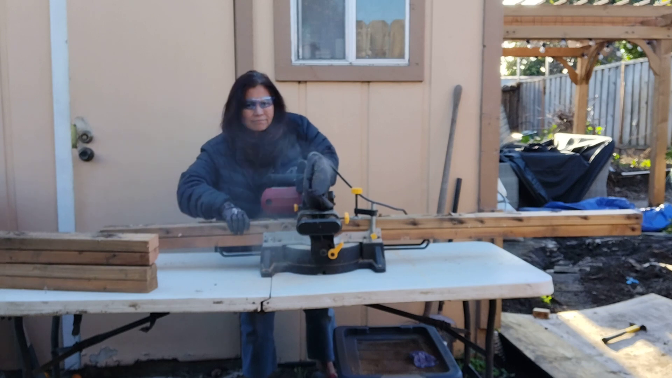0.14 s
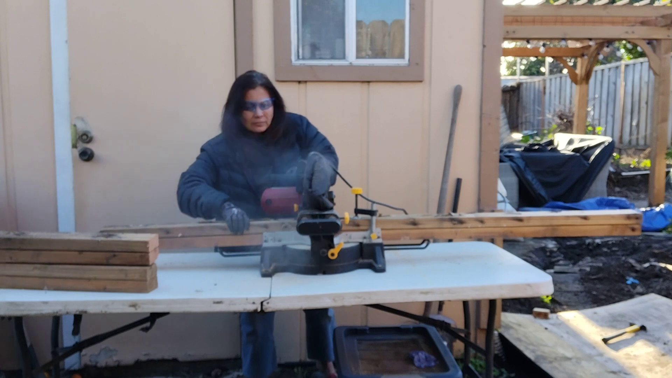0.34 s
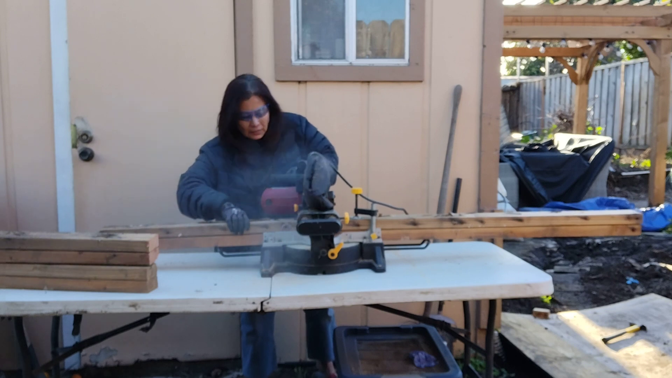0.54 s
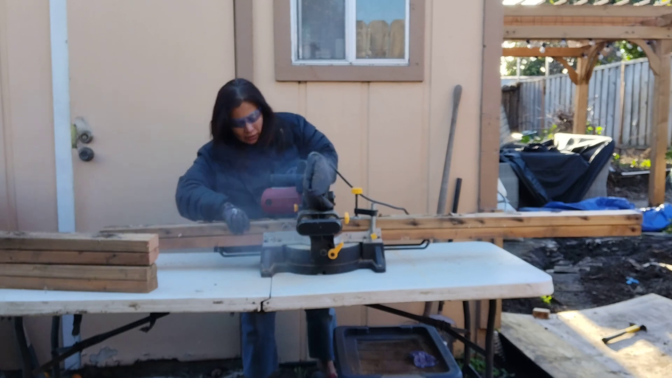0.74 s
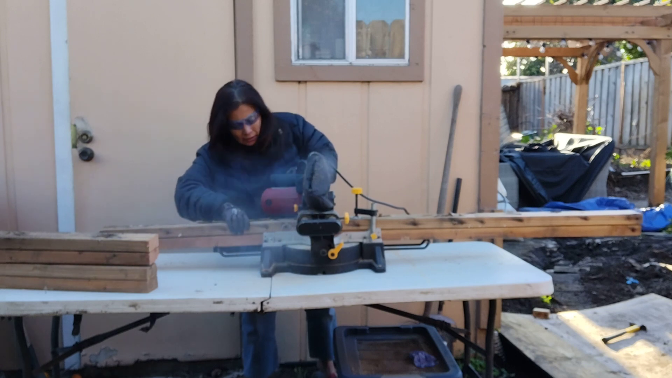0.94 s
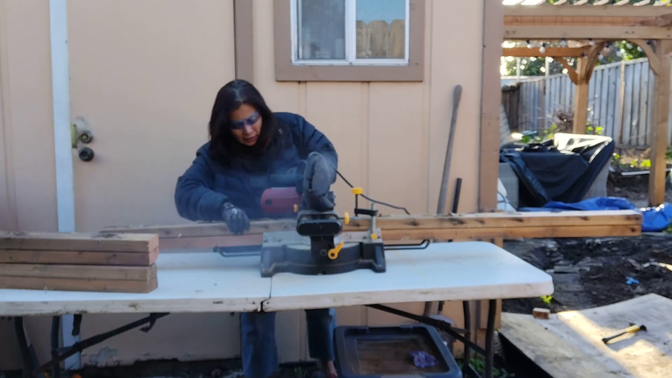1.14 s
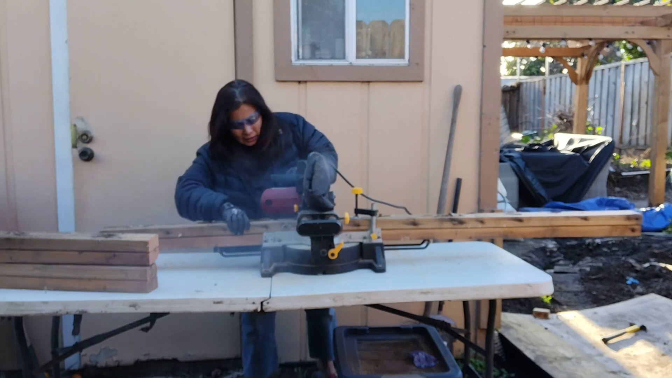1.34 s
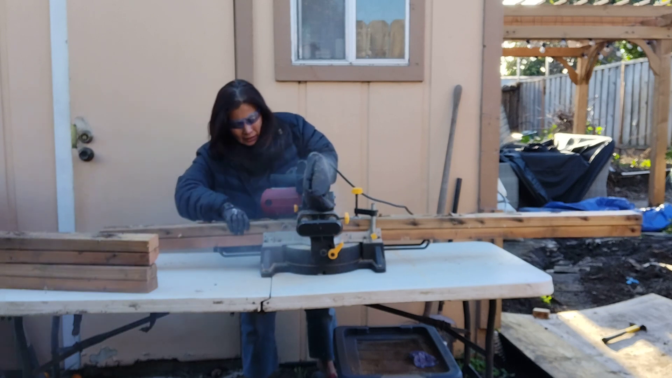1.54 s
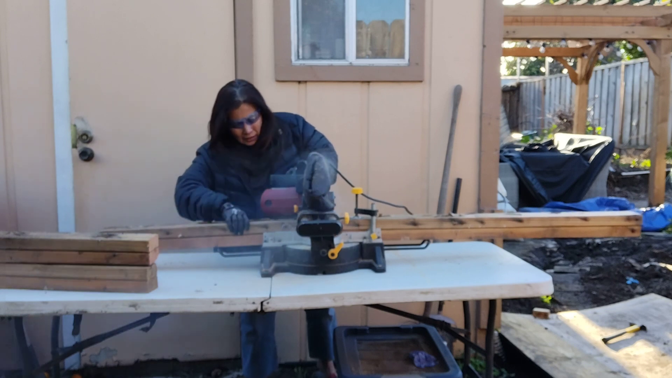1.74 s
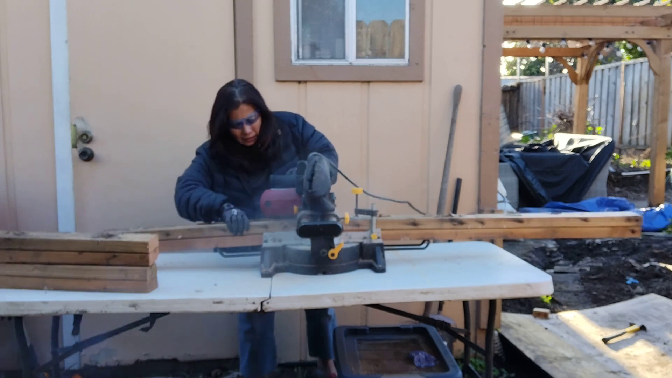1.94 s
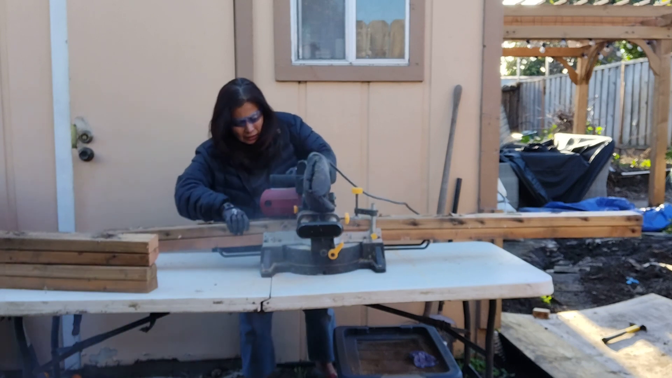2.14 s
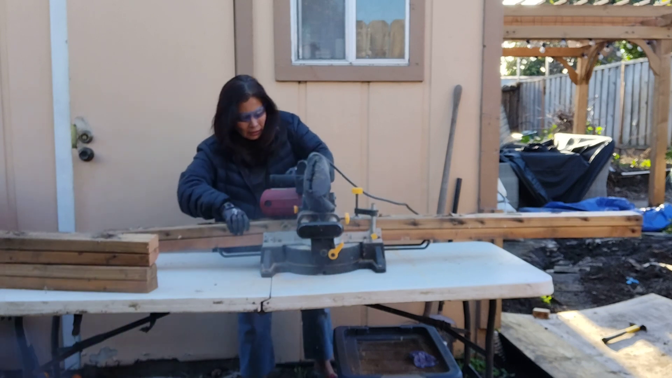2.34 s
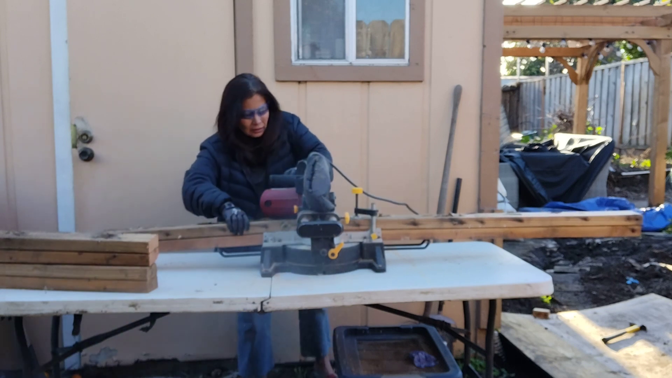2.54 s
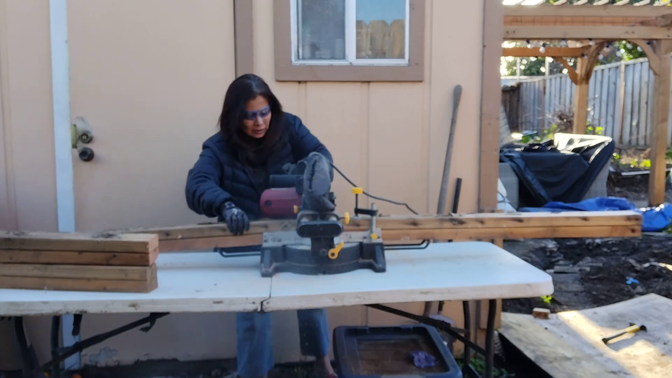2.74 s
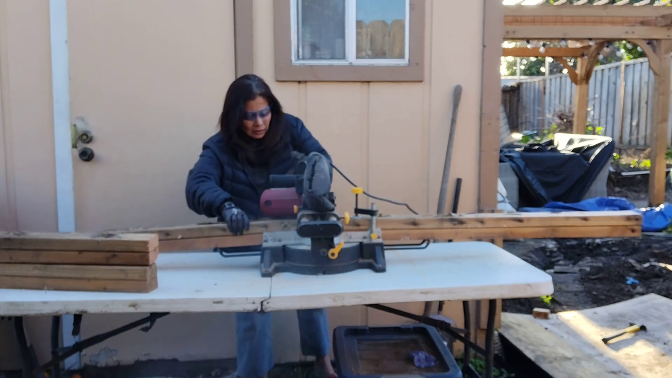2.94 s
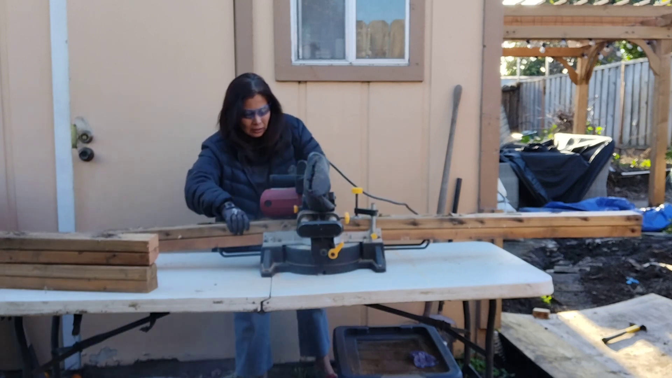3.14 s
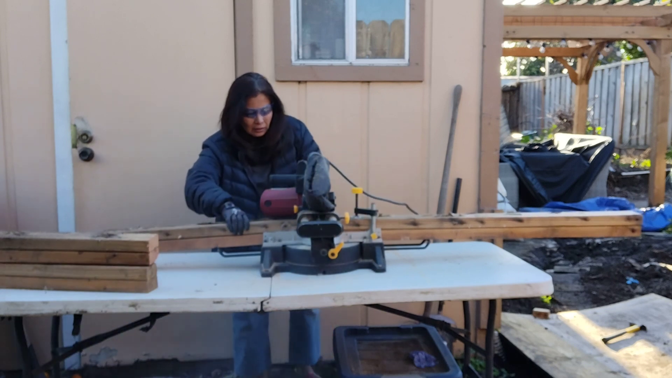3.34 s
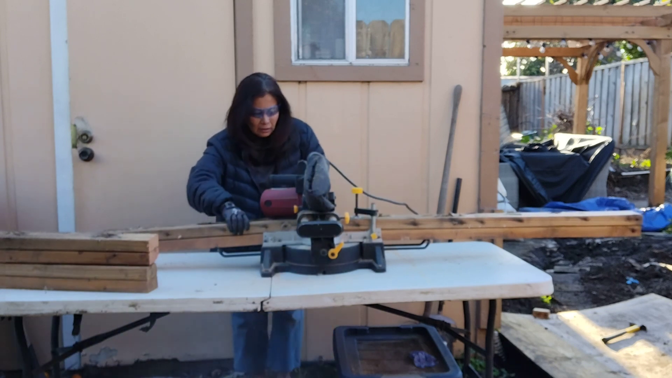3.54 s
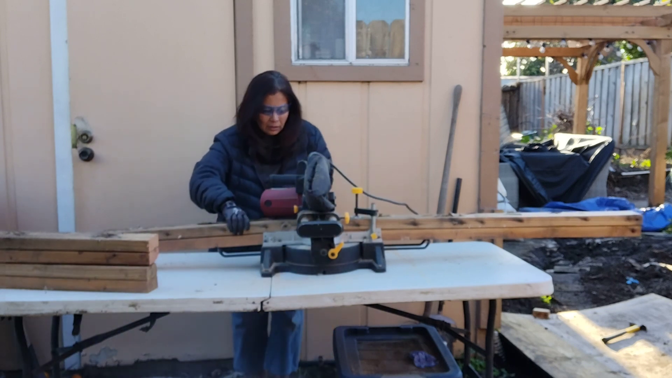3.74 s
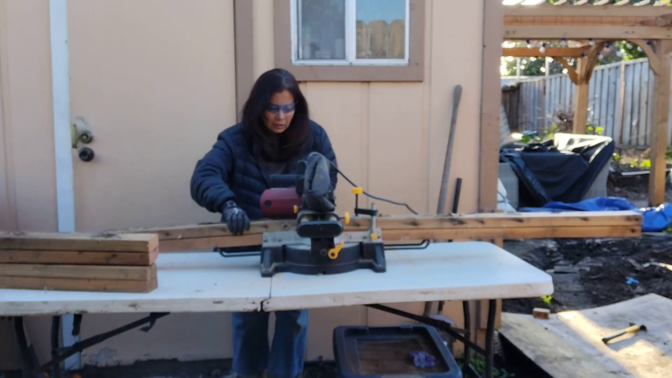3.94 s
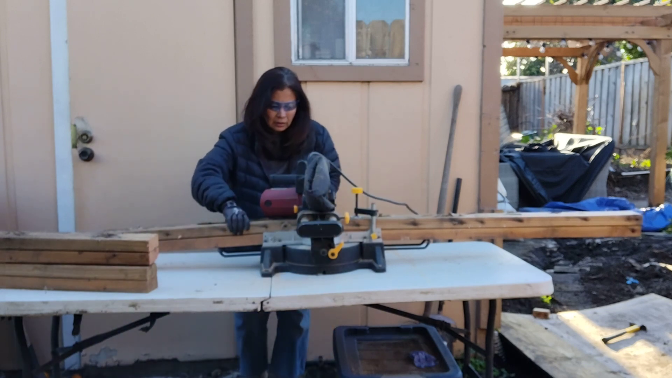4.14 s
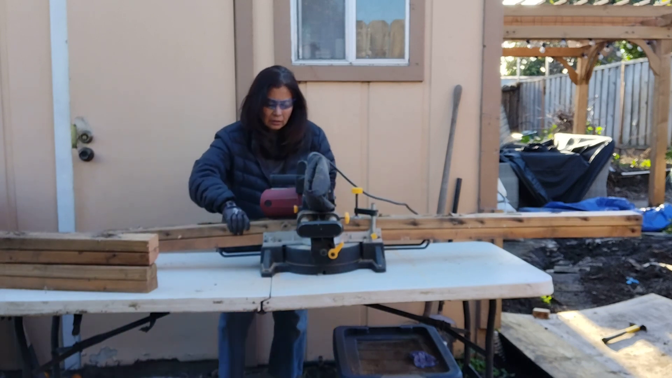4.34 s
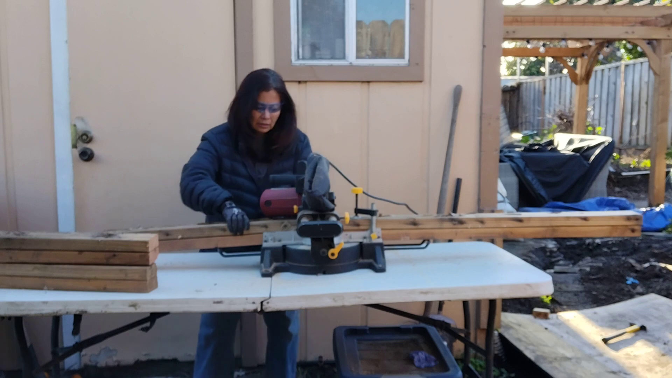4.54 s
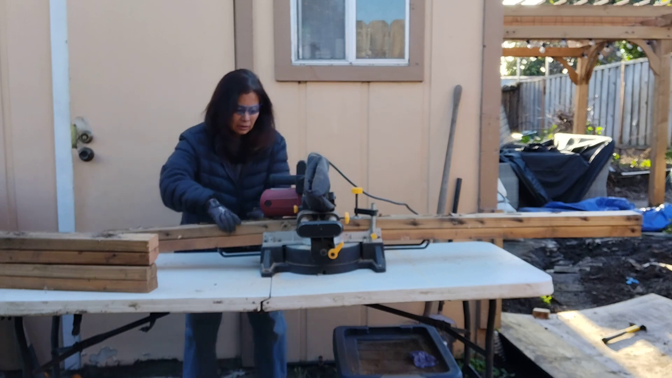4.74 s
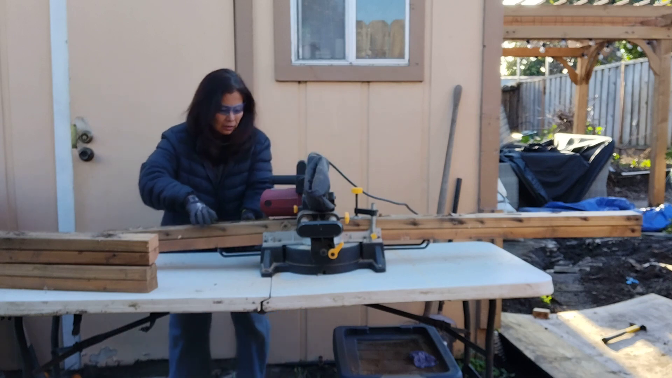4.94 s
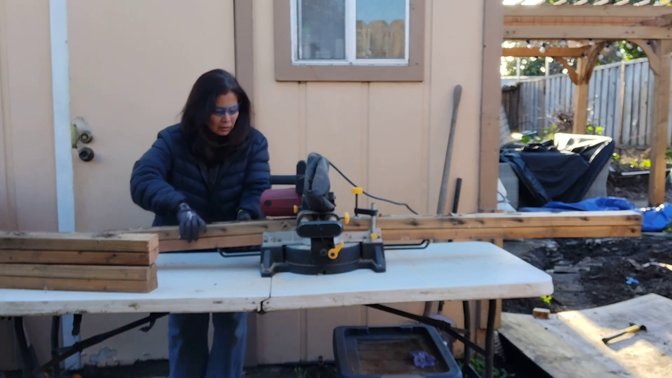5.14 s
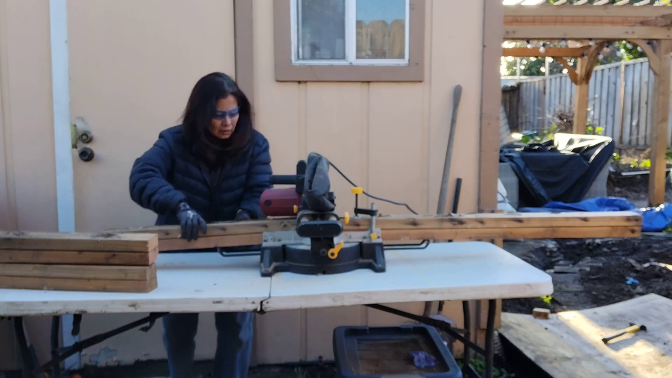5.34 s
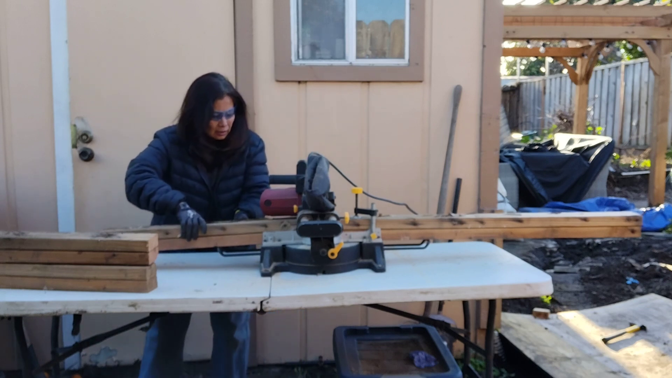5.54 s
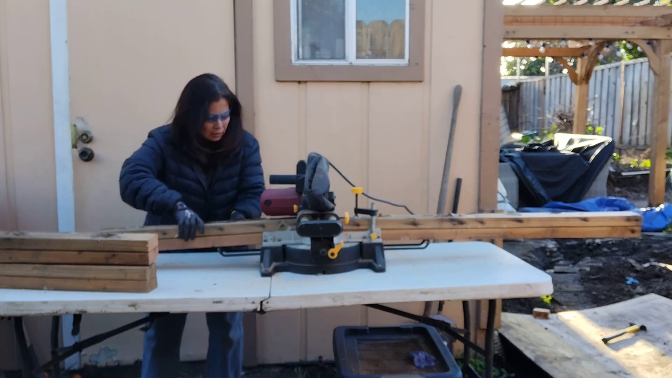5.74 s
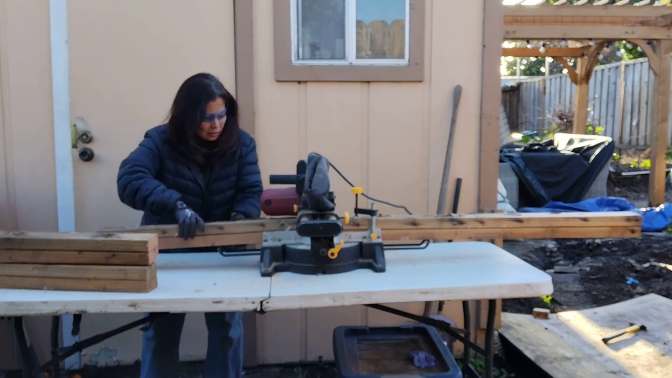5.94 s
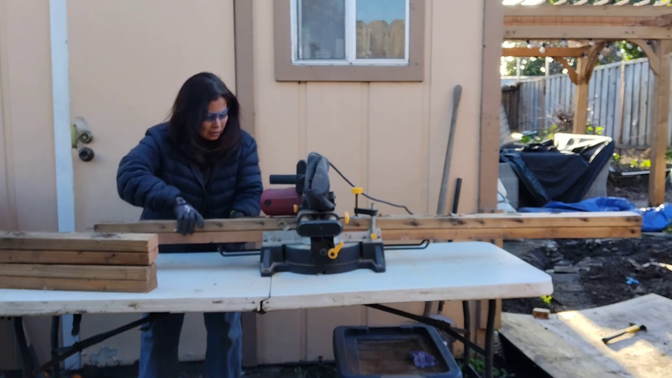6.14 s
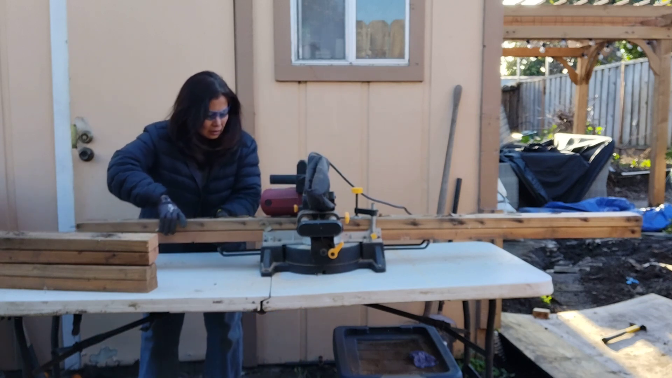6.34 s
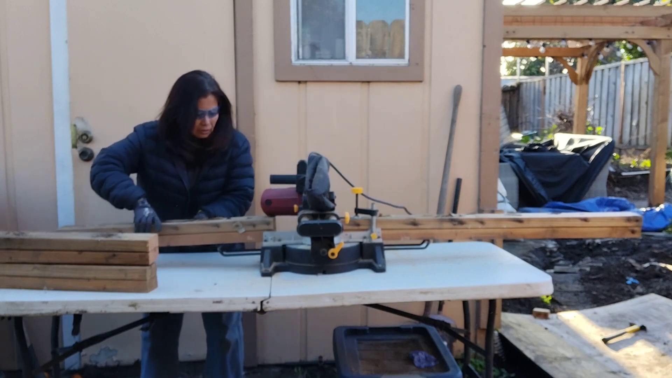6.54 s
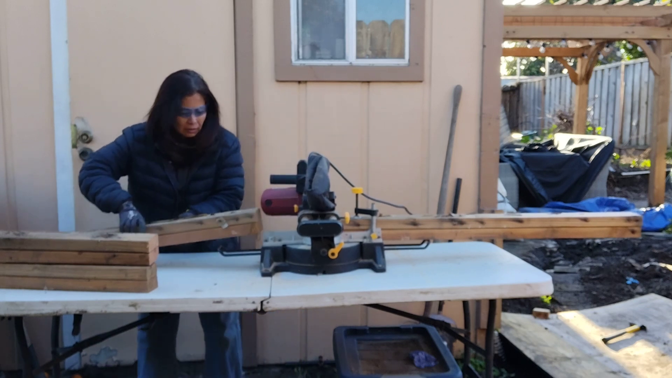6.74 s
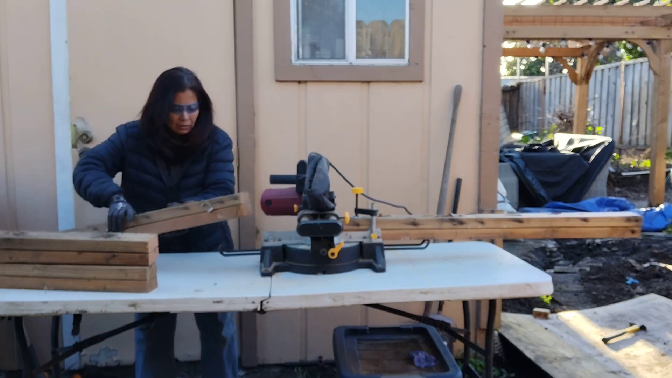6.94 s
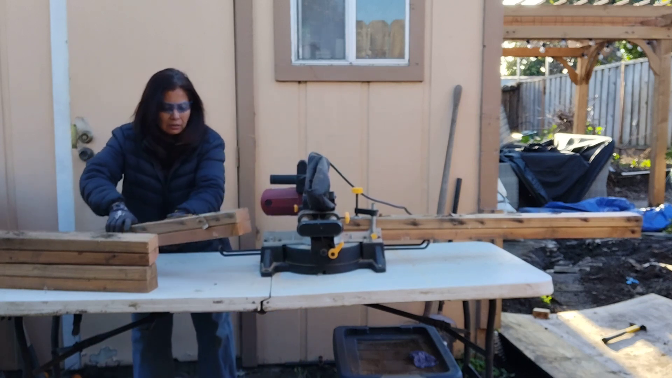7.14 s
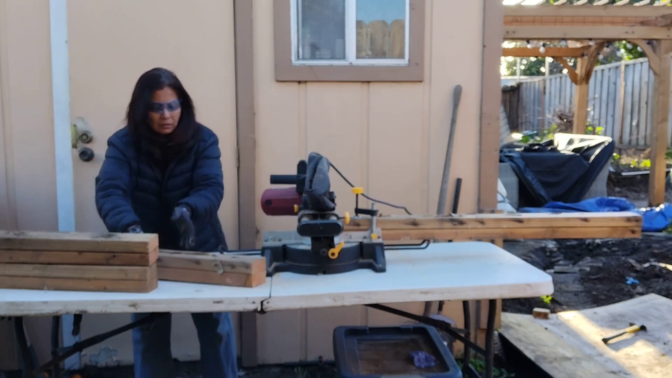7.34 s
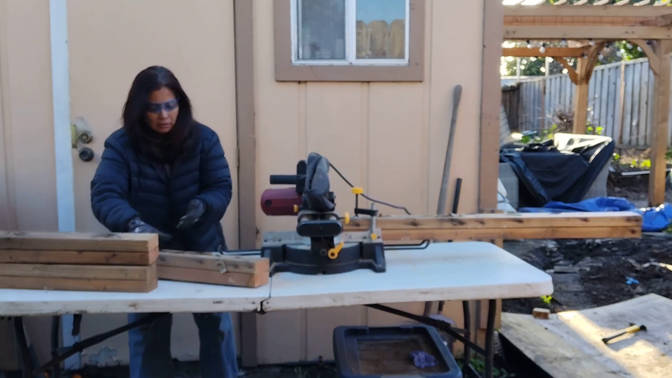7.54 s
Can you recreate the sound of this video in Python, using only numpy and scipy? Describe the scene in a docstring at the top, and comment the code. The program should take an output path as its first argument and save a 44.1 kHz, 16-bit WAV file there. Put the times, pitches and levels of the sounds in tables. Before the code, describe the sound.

Loud power saw cutting a board outdoors, teeth shrieking, then blade winding down slowly, followed by clunks and a rattle as the offcut is set down.

```python
"""A miter saw cuts old lumber in a backyard

The teeth sing and rasp while gears and motor strain; then the blade runs free and coasts down.
One curve of blade speed steers the tones, the repeating and steady noise, and the falling whistles.
The offcut slides with bursts of rough noise, knocks as wood and folding table ring in decaying
modes, and rattles a steel support. Fading noise gives the answer of the house wall."""
import sys
import numpy as np
from scipy import signal
from scipy.fft import rfft, irfft, next_fast_len
from scipy.io import wavfile

SR = 44100
rng = np.random.default_rng(int(sys.argv[2]) if len(sys.argv) > 2 else 0)


def wrap_up_sound(samples):
    """Save the sound to the file named by the first command line argument, as 16-bit audio."""
    columns = np.atleast_2d(samples).T
    # keep every value between -1 and 1, then stretch to whole-number steps
    tamed = np.clip(columns, -1, 1)
    steps = np.round(tamed * 32767).astype(np.int16)
    wavfile.write(sys.argv[1], SR, steps)


N = 338688  # length in samples

OFF_S = 2.592  # the trigger is let go, in seconds
TOOTH_COUNT = 40  # teeth on the blade
GEAR_RATIO = 5.168  # turns of the motor shaft per turn of the blade

# The clack of wood, also used for the support and the dragging wood.
# Each row: frequency in Hz, relative level in dB per Hz.
CLACK_SPECTRUM = [(400, -21), (750, 3.5), (1200, -5), (1900, -6.5), (2600, -15.5), (4000, -23.5)]


def amp(db):
    """Turn decibels into a gain."""
    return 10 ** (np.asarray(db) / 20)


def unit(x):
    """Scale a sound to an rms level of 1."""
    return x / np.sqrt(np.mean(np.abs(x) ** 2) + 1e-20)


def along(points, hz):
    """Read a value between (Hz, value) points on a logarithmic frequency axis."""
    f, v = np.transpose(points)
    return np.interp(np.log(hz + 1), np.log(f + 1), v)


def curves(rows):
    """Draw one value per sample for each column after the time in seconds."""
    s, *cols = np.transpose(rows)
    return [np.interp(np.arange(N) / SR, s, c) for c in cols]


def wobble(rate):
    """Make a smooth random curve of rms 1 with about rate random points a second."""
    return unit(signal.resample(rng.standard_normal(int(N * rate / SR) + 4), N))


def filtered(x, response):
    """Shape the spectrum of x by a response, a function of frequency."""
    n = x.shape[-1]
    m = next_fast_len(n + SR // 4)
    return irfft(rfft(x, m) * response(np.fft.rfftfreq(m, 1 / SR)), m)[..., :n]


def resonance(f, hz, width):
    """Respond like a body that vibrates most at one frequency, with gain 1 there."""
    return 1j * f * width / (hz * hz - f * f + 1j * f * width)


def colored(x, spectrum):
    """Give x a spectrum that fades out at both ends, and an rms level of 1."""
    ends = [(spectrum[0][0] / 2, -120), *spectrum, (spectrum[-1][0] * 2, -120)]
    return unit(filtered(x, lambda f: amp(along(ends, f))))


def noise(spectrum, size=N):
    """Make independent mid (center) and side noise with the given spectrum."""
    return colored(rng.standard_normal((2, size)), spectrum)


def blend(share, a, b):
    """Mix unrelated sounds by their share of the power."""
    return np.sqrt(share) * a + np.sqrt(1 - share) * b


def add(track, s, sound):
    """Mix a sound into a track at time s in seconds."""
    part = track[:, round(s * SR):][:, :sound.shape[-1]]
    part += sound[:, :part.shape[-1]]


def envelope(s, length, attack, t60):
    """Rise at time s, hold until length seconds later, then fall 60 dB per t60 seconds."""
    t = np.arange(N) / SR - s
    return np.clip(t / attack, 0, 1) * amp(-60 * np.maximum(t - length, 0) / t60)


def line(turns, multiple, flutter):
    """Make one fluttering tone locked to the turns; its side part runs about a quarter cycle off."""
    phase = 2 * np.pi * (multiple * turns + rng.random()) + flutter * wobble(35)
    mid_side = np.array([np.cos(phase), np.sin(phase + 0.1 * wobble(3.1))])
    return np.sqrt(2) * (1 + flutter * wobble(35)) * mid_side


def narrow(shaft, multiple, width, size=32768):
    """Make a noise band around a multiple of the shaft rate; narrower bands hold more steady tone."""
    knots = rng.standard_normal((2, size)) + 1j * rng.standard_normal((2, size))
    drift = np.array([np.interp(2 * width * multiple * shaft, np.arange(size), k) for k in knots])
    steady = np.exp(-width / 0.0087) * 4 * np.exp(2j * np.pi * rng.random((2, 1)))
    carrier = np.exp(2j * np.pi * multiple * shaft)
    return np.sqrt(2) * np.real(unit(drift + steady) * carrier)


def bites(turns, spectrum, size=4096):
    """Repeat a noise pattern with each turn, as every tooth tears or rubs in its own way."""
    pattern = signal.resample(rng.standard_normal((2, size // 7)), size, axis=1)
    repeated = np.array([np.interp(turns % 1, np.arange(size) / size, p) for p in pattern])
    return colored(repeated, spectrum)


def by_speed(speed, db, slope, stall_rate=0, order=4):
    """Lower the gain as a power of the speed, and steeply below the stall rate in turns per second."""
    return amp(db) * (speed / speed.max()) ** slope / (1 + (stall_rate / speed) ** order)


def near(speed, best, reach):
    """Make a gain that peaks at the best speed and is halved reach octaves away."""
    return .5 ** ((np.log2(speed / best) / reach) ** 2)


def power(release_s=0.09):
    """Return 1 while the motor pulls, falling to 0 as the trigger is let go."""
    return np.clip((OFF_S - np.arange(N) / SR) / release_s, 0, 1)


def blade_speed():
    """Drive the blade in turns per second, then let friction and air drag slow it."""
    # The blade under power. Each row: time in seconds, turns per second.
    spin = [(0.0, 52.8), (0.12, 53.7), (0.25, 54.6), (0.4, 55.3), (0.7, 56.54), (1.2, 56.53), (1.7, 56.78),
            (2.0, 57.72), (2.2, 59.44), (2.5, 60.3)]
    friction_per_s, air_drag_per_turn = .618, .0089
    tail_rate, tail_friction_per_s = 29.8, .53  # turns per s at switch-off, slower decay of the last turns
    driven = curves(spin)[0]
    coast = np.maximum(np.arange(N) / SR - OFF_S, 0)
    decay = np.exp(-friction_per_s * coast)
    drag = driven * air_drag_per_turn / friction_per_s * (1 - decay)
    slowing = driven * decay / (1 + drag)
    return np.maximum(slowing, tail_rate * np.exp(-tail_friction_per_s * coast))


def housing(x, direct_db=0):
    """Add the resonances of the housing, which radiates little deep bass or top treble."""
    # Each row: frequency in Hz, width in Hz, level in dB.
    modes = [(155, 30, 6), (515, 60, 18.5), (962, 32, 20.5), (1880, 130, 10), (3300, 300, 6),
             (5700, 900, 11)]

    def body(f):
        return amp(direct_db) + sum((amp(db) - 1) * resonance(f, hz, width) for hz, width, db in modes)

    def radiation(f):
        return f ** 4 / (f ** 4 + 145 ** 4) / (1 + (f / 10000) ** 4)

    return filtered(x, lambda f: body(f) * radiation(f))


def drive(turns, load, bite):
    """Gears and motor sing at multiples of the blade rate under load, until the blade breaks through."""
    # Tones of the loaded drive. Each row: multiple of the blade rate, level in dB before a 2 dB cut.
    loaded = [(6, -42.5), (8, -36.5), (9, -32), (10, -34.5), (16, -36.5), (17, -26), (24, -39), (25, -35.5),
              (27, -39), (31, -41.5), (33, -34), (37, -38.5), (39, -34), (41, -32), (42, -36), (44, -34.5),
              (53, -37.5), (56, -36.5), (60, -40), (69, -39.5), (70, -31), (73, -37.5), (79, -39),
              (81, -34.5), (93, -39.5), (96, -39), (98, -37), (100, -40.5), (111, -42), (116, -42.5),
              (118, -39), (121, -34.5)]
    # Low hum of the motor under load. Each row: multiple of the blade rate, level in dB.
    motor = [(3.668, -40), (4.649, -40.5), (5.604, -47)]
    hum_order, whine_order = 18, 32  # cycles per turn of the blade
    hum_db, whine_db = -37.5, -32.5
    whine_grows = 6.3  # dB per dB of load
    gears = housing(amp(hum_db) * load ** 0.15 * line(turns, hum_order, flutter=0.17))
    whine = amp(whine_db) * load ** whine_grows * line(turns, whine_order, flutter=0.32)
    strain = sum(amp(db - 2.0) * line(turns, round(k), flutter=0.41) for k, db in loaded)
    hum = sum(amp(db) * line(turns, k, flutter=0.12) for k, db in motor)
    in_cut = np.minimum(2 * bite, 1)
    return in_cut * (gears + whine + load * strain) + np.minimum(2 * load, 1) * hum


def teeth(turns, bite):
    """The tooth rate and its overtones grow with the bite; at times one swells to a squeal in the cut."""
    # Teeth striking wood. Each row: multiple of the tooth rate, level in dB at a bite of 0 dB.
    overtones = [(1, -29), (2, -29.5), (3, -30.5), (4, -38), (5, -46), (6, -50), (7, -52)]
    # Squeals. Each row: start in seconds, length in seconds, multiple of the tooth rate, level in dB.
    squeals = [(0.057, 0.29, 2, -28.5), (0.197, 0.062, 1, -18.5), (0.425, 0.35, 1, -18),
               (0.46, 0.18, 2, -28.5), (0.659, 0.65, 2, -16.5), (1.168, 0.53, 1, -22.5),
               (1.626, 0.16, 2, -23), (1.67, 0.049, 1, -20), (0.053, 0.19, 4, -39.5),
               (0.952, 0.54, 4, -34.5), (0, 0.39, 3, -28), (0, 0.35, 6, -41.5), (0, 0.58, 7, -36.5)]
    teeth_grow = 0.88  # dB per dB of bite
    attack_s, squeal_t60 = 0.031, 0.79  # seconds
    out = np.zeros((2, N))
    for multiple, db in overtones:
        squeal_power = 0
        for s, length, k, level in squeals:
            if round(k) == round(multiple):
                squeal_power = squeal_power + amp(2 * level) * envelope(s, length, attack_s, squeal_t60) ** 2
        gain = np.sqrt((amp(db) * bite ** teeth_grow) ** 2 + squeal_power)
        flutter = 0.15 * max(multiple - 1, 1) ** 0.91
        out = out + gain * line(turns, round(multiple) * TOOTH_COUNT, flutter)
    return out


def machine(speed, turns, load, bite, clatter=0.17, judder_db=1.1, strain_db=2):
    """Rumble, air rush, hiss and the rasp of the cut; the motor shaft chops them as it slows."""
    # Spectra at high and low speed. Each row: frequency in Hz, relative level in dB per Hz.
    rumble_fast, rumble_slow = [(26, -64.5), (45, -31), (133, -20.5), (201, -11), (247, -14.5), (286, -12),
                                (326, -8.5), (406, -10.5), (514, 2.5), (650, -10), (846, -2.5), (995, -3.5),
                                (1090, -21), (1310, -9), (1500, -17.5), (1950, -36), (3300, -120)], [(45, -28), (95, -8), (125, -21), (158, -9), (200, -16.5),
                                                (290, -12), (420, -9), (522, 6.5), (630, -12), (780, -1),
                                                (870, -5.5), (950, 7), (1060, -29.5), (1500, -29)]
    rush_fast, rush_slow = [(800, -23.5), (1150, 5), (1700, -1), (2300, 4.5), (2700, -1), (3500, 0),
                            (4300, -13.5), (5500, -26.5)], [(800, -21), (1150, 8), (2000, 5.5), (2700, 1.5), (3300, -5),
                                          (4100, -13.5), (5500, -21)]
    hiss_fast, hiss_slow = [(3200, -27.5), (4400, -0.5), (5600, 1.5), (6700, -3), (8000, -9.5),
                            (9200, -14.5), (12000, -19), (15800, -17)], [(3200, -15), (4400, -4), (5600, 10.5), (6500, -2), (8000, -8.5),
                                          (9200, -26.5), (12000, -34), (15800, -19.5)]
    # Teeth tearing wood. Each row: frequency in Hz, relative level in dB per Hz.
    rasp_spectrum = [(3200, -12), (4300, 6.5), (5500, 2.5), (6700, -0.5), (7600, -7), (9000, -7),
                     (10500, -21.5), (12000, -26.5), (13500, -9), (15800, -20.5)]
    # All this noise swells and sinks. Each row: time in seconds, gain in dB.
    swell = [(1.4, 0.5), (2.1, 3), (2.6, 1.5), (2.95, -3), (3.7, 3), (4.4, 3.5), (5.45, 2), (5.8, 6.5),
             (6.17, 0.5), (6.35, 3), (6.9, 6), (7.25, -15)]
    # Levels at full speed, and the powers of the speed they follow.
    rumble_db, rumble_slope = -26.5, 1.17
    rush_db, rush_slope = -24, 1.304  # air stirred by the blade
    rush_load_db, rush_grows = -28, 4.2  # added rush at a load of 0 dB; dB per dB of load
    hiss_db, hiss_slope, hiss_stall_rate = -30.5, 0.27, 26.4  # air hiss, dying below this many turns per s
    bearing_db, bearing_slope = -49.5, 1.08  # bearing hiss, which outlasts the air
    rasp_db = -23.5  # at a bite of 0 dB
    tooth_repeat, ripple_share = .4, 0.16  # shares repeating with the blade in wood, with the motor shaft

    fast = np.clip((speed - 14) / 32, 0, 1)
    in_wood = np.clip(load, 0, 1)
    locked = tooth_repeat * in_wood

    rumble = blend(fast, noise(rumble_fast), amp(-0.5) * noise(rumble_slow))
    rumble = by_speed(speed, rumble_db + strain_db * in_wood, rumble_slope) * rumble

    flow = np.hypot(by_speed(speed, rush_db, rush_slope), amp(rush_load_db) * load ** rush_grows)
    ripple = unit(np.sqrt(speed) * bites(GEAR_RATIO * turns, rush_slow, size=1400))
    slow = amp(-3.0) * blend(ripple_share, ripple, noise(rush_slow))
    rush = flow * blend(locked, bites(turns, rush_fast), blend(fast, noise(rush_fast), slow))

    rasp = amp(rasp_db) * bite * blend(locked, bites(turns, rasp_spectrum), noise(rasp_spectrum))

    air = by_speed(speed, hiss_db, hiss_slope, hiss_stall_rate) * (1 - in_wood / 2)
    bearing = by_speed(speed, bearing_db, bearing_slope)
    hiss = np.hypot(air, bearing) * blend(fast ** 4, noise(hiss_fast), noise(hiss_slow))

    shaft = 1 + clatter * (1 - fast) * np.cos(2 * np.pi * GEAR_RATIO * turns)
    runout = 1 + 0.19 * in_wood * np.cos(2 * np.pi * turns)  # pulses once a turn in the wood
    level = amp(curves(swell)[0] + judder_db * wobble(45))
    return shaft * runout * level * (rumble + rush + rasp + hiss)


def plate():
    """The pinched blade plate rings at its own pitch as it breaks through."""
    # Each row: start in seconds, length in seconds, pitch in Hz, level in dB.
    rings = [(1.821, 0.021, 970, -25), (1.902, 0.067, 955, -18.5)]
    attack_s, ring_t60 = 0.015, .16  # seconds
    t = np.arange(N) / SR
    return sum(amp(db) * envelope(s, length, attack_s, ring_t60) * line(t, hz, flutter=0.19)
               for s, length, hz, db in rings)


def free_blade(speed, turns, load):
    """Out of the wood the teeth whine in the air, rising with speed and fading soon after switch-off."""
    # Each row: multiple of the motor shaft rate, level in dB, relative width.
    whines = [(7.686, -27.5, 0.022), (15.8, -45.5, 0.016), (33.4, -48, .015)]
    reach_oct = 0.31  # they fall 6 dB this far below full speed
    whine = sum(amp(db) * narrow(GEAR_RATIO * turns, k, width) for k, db, width in whines)
    return (1 - np.minimum(load, 1)) ** 2 * near(speed, speed.max(), reach_oct) * whine


def buzz(speed, turns, size=4096, count=48):
    """The coasting motor sounds multiples of its shaft rate: a dense bundle of tones that fall together."""
    # Each row: multiple of the shaft rate, level in dB at full speed.
    levels = [(5, -49), (10, -46), (12, -53), (16, -47), (20, -45), (23, -46), (26, -55), (29, -52),
              (36, -52), (40, -60), (48, -62)]
    slope, stall_rate = .8, 19  # power of the speed; it dies below this many turns per s
    jitter_turns = .008  # unsteadiness of the shaft
    k = np.arange(count + 1)
    random_phase = np.exp(2j * np.pi * rng.random((2, len(k))))
    lines = amp(along(levels, k)) * (k >= levels[0][0]) * random_phase
    cycle = irfft(lines, size) * size / np.sqrt(2)
    shaft = GEAR_RATIO * turns + jitter_turns * wobble(50)
    wave = np.array([np.interp(shaft % 1, np.arange(size) / size, c) for c in cycle])
    return wave * by_speed(speed, 0, slope, stall_rate) * (1 - power())


def whistles(speed, turns, echo=0.55):
    """Whistles speak near their own speeds and, like the gear drone, flare at housing resonances."""
    # Whistles and hisses of the coasting motor, fan and blade.
    # Each row: multiple of the motor shaft rate, level in dB, relative width,
    # blade turns per second where it is loudest, octaves of speed to fall 6 dB.
    voices = [(1.963, -45, .015, 72, 0.6), (2.997, -55, 0.044, 12, 0.35), (3.89, -54, .05, 13, .5),
              (4.483, -43, 0.011, 46, 0.5), (5.99, -50.5, 0.012, 45, 1.04), (7.826, -44, 0.007, 25, 0.31),
              (8.13, -44, .012, 39, 0.65), (8.96, -32.5, .01, 58.5, .5), (9.07, -48.5, .015, 21, 0.46),
              (9.5, -31.5, .04, 66, 0.34), (16.06, -40.5, .008, 31, 0.5), (17.9, -38, .009, 33.6, 0.69),
              (18.37, -34.5, 0.053, 58, 0.57), (27.7, -46.5, .06, 38, 0.3), (32, -55, .03, 13, 0.5),
              (36, -44.5, 0.05, 32, 0.57), (45.8, -51, .025, 22, 0.14), (63.3, -57, 0.004, 5.36, .12)]
    powered_db = -18  # gain of the whistles while the motor pulls
    drone_order = 20  # cycles of the unloaded gears per turn of the blade
    drone_db, drone_slope, drone_stall_rate, drone_attack_s = -28, 1.73, 19.6, 0.33
    air = sum(amp(db) * near(speed, best, reach) * narrow(GEAR_RATIO * turns, k, width)
              for k, db, width, best, reach in voices)
    air = air * amp(powered_db * power())
    slack = np.clip((np.arange(N) / SR - OFF_S) / drone_attack_s, 0, 1)
    drone_gain = slack * by_speed(speed, drone_db, drone_slope, drone_stall_rate)
    drone = drone_gain * line(turns, drone_order, flutter=0.53)
    # The gears sound mostly through the resonances.
    direct = housing(air + buzz(speed, turns), direct_db=-3) + housing(drone, direct_db=-13)
    return direct + echo * wall(direct[0])  # the late echo beats against the falling pitch


def imbalance(speed, turns, load, order=12):
    """Out of the wood the rotor hums near its shaft rate, until the housing can no longer radiate it."""
    hum_multiple, hum_db = 1.03, -41  # multiple of the shaft rate; level
    stall_rate = 27.4  # turns per s where it fades
    gain = amp(hum_db) / (1 + (stall_rate / speed) ** order) * (1 - np.minimum(load, 1)) ** 4
    return gain * line(turns, hum_multiple * GEAR_RATIO, flutter=0.2)


def wooden(modes):
    """Combine modes of alternating sign, with the deepest bass and the treble softened."""
    def response(f):
        ringing = sum((-1) ** k * amp(level) * resonance(f, hz, width)
                      for k, (hz, width, level) in enumerate(modes))
        return ringing / (1 + 1j * f / 900) * 1j * f / (45 + 1j * f)
    return response


def knocks(thud_t60=0.077, clack_t60=0.14, crack_t60=0.046, attack=0.0012, push=22, size=SR // 2):
    """Wood lands on one edge, then the other, pushing table and board into their modes with clacks."""
    # Wood striking the saw and table. Each row: time in seconds, table level in dB and board level
    # in dB (both before a 6 dB cut), clack level in dB, crack level in dB.
    strikes = [(5.759, -58, -49, -50, -46), (5.786, -64, -50, -37.5, -62), (5.836, -65, -45, -42, -60),
               (6.283, -66, -56, -47, -66), (6.403, -43.5, -42, -36.5, -38.5),
               (6.666, -41, -32, -33.5, -44.5), (6.752, -42, -36.5, -41, -61),
               (6.853, -22, -24, -40, -48.5), (6.876, -42, -44.5, -39.5, -42.5),
               (6.895, -34, -40, -41, -58), (6.982, -27, -36, -41, -60), (7.431, -29, -33.5, -34, -46.5),
               (7.447, -16.5, -27, -18.5, -27.5), (7.497, -20, -26, -21, -34.5),
               (7.555, -17.5, -24, -23.5, -36.5), (7.583, -28.5, -42, -21, -43),
               (7.641, -18, -31.5, -23, -42)]
    # The folding table and the offcut. Each row: frequency in Hz, width in Hz, level in dB.
    table_modes, board_modes = [(69.4, 29, -10.5), (136, 97, -7.5), (223, 51, -1), (256, 33, 1),
                                (334.7, 32, -5)], [(400, 170, -5), (540, 52, 3), (600, 220, -9.5)]
    # The short crack. Each row: frequency in Hz, relative level in dB per Hz.
    crack_spectrum = [(1500, -20), (2600, 0), (4000, -2), (6000, -10), (9000, -20), (12000, -36),
                      (15000, -36)]
    rock_s, rock_db = .017, -5  # the other edge lands later and softer
    out, t = np.zeros((2, N)), np.arange(size) / SR
    rise = 1 - np.exp(-t / attack)
    for s, table_db, board_db, clack_db, crack_db in strikes:
        for at, gain in ((s, 1), (s + rock_s, amp(rock_db))):
            for modes, db in ((table_modes, table_db), (board_modes, board_db)):
                impulse = push * np.outer([1, 0], t == 0)  # mid only
                rough = rng.standard_normal((2, size)) * amp(-60 * t / thud_t60)
                thud = filtered(impulse + rough, wooden(modes))
                thud = thud / np.std(thud[:, :SR // 32], axis=1, keepdims=True)
                add(out, at, gain * amp(db - 6.0) * thud)
            clack = amp(clack_db - 60 * t / clack_t60) * noise(CLACK_SPECTRUM, size)
            crack = amp(crack_db - 60 * t / crack_t60) * noise(crack_spectrum, size)
            add(out, at, gain * rise * (clack + crack))
    return out


def support(size=SR // 2):
    """The steel work support bounces and rings in decaying tones as the offcut leaves it."""
    # Bounces. Each row: time in seconds, level in dB before a 6 dB cut.
    rattles = [(6.9496, -23.5), (7.015, -26.5), (7.0491, -27.5), (7.082, -28), (7.1424, -28.5)]
    # Steel tones. Each row: frequency in Hz, level in dB, seconds to fall 60 dB.
    tones = [(1165, 0, .1), (1230, -3, .08), (2350, -17, .05)]
    out, t = np.zeros((2, N)), np.arange(size) / SR
    for s, db in rattles:
        ring = sum(amp(level - 60 * t / t60) * np.sin(2 * np.pi * (hz * t + rng.random((2, 1))))
                   for hz, level, t60 in tones)
        clack = amp(-4 - 60 * t / 0.04) * noise(CLACK_SPECTRUM, size)
        add(out, s, amp(db - 6) * (1 - np.exp(-t / 0.003)) * (ring + clack))
    return out


def scrape():
    """Rough wood catches and slips along the fence and drags over the bed, as unsteady noise."""
    # Each row: start in seconds, length in seconds, grit on the fence in dB, drag on the bed in dB.
    slides = [(6.53, 0.053, -42.5, -49), (6.817, 0.11, -57, -53), (6.905, 0.16, -79, -50)]
    # Gritty fence noise. Each row: frequency in Hz, relative level in dB per Hz.
    grit_spectrum = [(1800, -6), (2600, 0), (3800, 1.5), (4500, -10), (6000, -13), (8000, -26),
                     (13000, -45)]
    attack_s, slide_t60 = 0.004, 0.064  # seconds
    catch = unit(noise(grit_spectrum) * amp(2.5 * wobble(300)))
    drag = unit(noise(CLACK_SPECTRUM) * amp(5.1 * wobble(70)))
    return sum(envelope(s, length, attack_s, slide_t60) * (amp(grit_db) * catch + amp(drag_db) * drag)
               for s, length, grit_db, drag_db in slides)


def wall(x):
    """The house wall and yard answer 10 ms later with fading noise whose treble dies sooner."""
    # Each row: frequency in Hz, seconds to fall 60 dB.
    decay_times = [(100, 0.56), (1000, 0.24), (10000, 0.18)]
    hz, t, z = signal.stft(rng.standard_normal((2, SR // 2)), SR, nperseg=256)
    fading = z * amp(-60 * t / along(decay_times, hz)[:, None])
    tail = signal.istft(fading, SR, nperseg=256)[1]
    late = np.pad(x, (SR // 100, 0))[None]
    return signal.fftconvolve(late, tail / np.linalg.norm(tail[0]), axes=1)[:, :N]


def yard():
    """The yard is a faint steady noise, strongest in the bass."""
    # Each row: frequency in Hz, relative level in dB per Hz.
    yard_spectrum = [(18, -59.5), (30, -33.5), (97, -18), (185, -17.5), (216, -13), (288, -24), (524, -24),
                     (1920, -36.5), (2920, -38.5), (15000, -53)]
    return amp(-61.0) * noise(yard_spectrum)


def scene():
    """Blade speed and cut drive the saw; handling noises follow; the bass is near mono, the treble wide."""
    # The blade breaks through just before 2 s.
    # Each row: time in seconds, load on the drive in dB, bite of the teeth in dB.
    cut = [(0, -16, 4), (.3, -0.5, 0.5), (.45, -1.5, -2), (.95, 0, -0.5), (1.22, 0.5, -3.5),
           (1.44, 1.5, 1.5), (1.6, 0.5, -3), (1.83, 1, 0), (1.93, -12, -20), (2.1, -17, -47.5),
           (2.7, -73.5, -87.5)]
    # Stereo width. Each row: frequency in Hz, gain of the side sound in dB.
    side_gain = [(60, -21), (110, -23), (200, -22), (380, -17), (700, -11), (1290, -7), (2380, -3.5),
                 (4400, -2), (8120, 0), (15000, 0)]
    speed = blade_speed()
    turns = np.cumsum(speed) / SR
    load, bite = amp(curves(cut))
    saw = drive(turns, load, bite) + teeth(turns, bite) + machine(speed, turns, load, bite)
    saw = saw + plate() + free_blade(speed, turns, load)
    saw = saw + whistles(speed, turns) + imbalance(speed, turns, load)
    handling = knocks() + support() + scrape()
    mid, side = saw + handling + amp(-5) * wall(handling[0]) + yard()
    side = filtered(side, lambda f: amp(along(side_gain, f)))
    return np.array([mid + side, mid - side]) * amp([[.3], [-.3]])  # left slightly louder


def record(dry):
    """Clip at full scale, then keep only what lies below the band limit."""
    top_hz = 16000
    return filtered(np.clip(dry, -1, 1), lambda f: f < top_hz)


dry = scene()
out = record(dry)
wrap_up_sound(out)
```